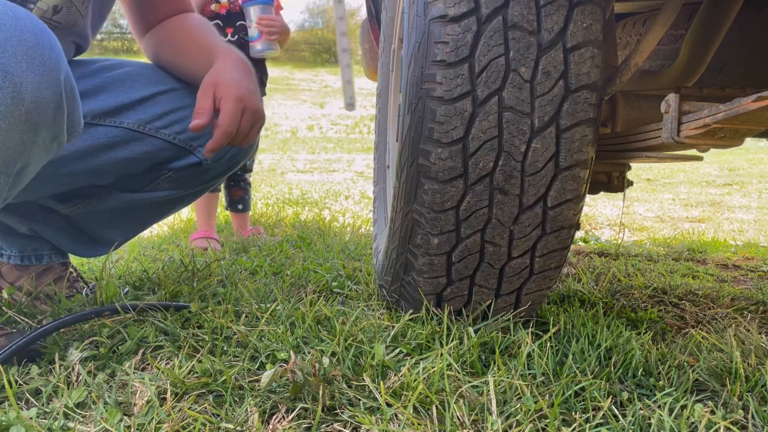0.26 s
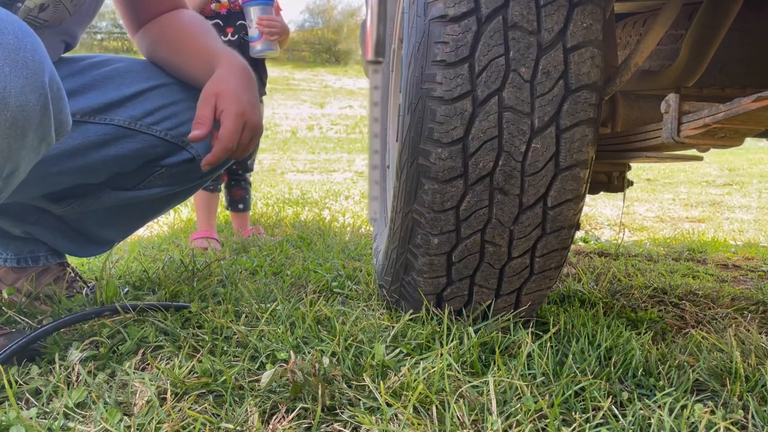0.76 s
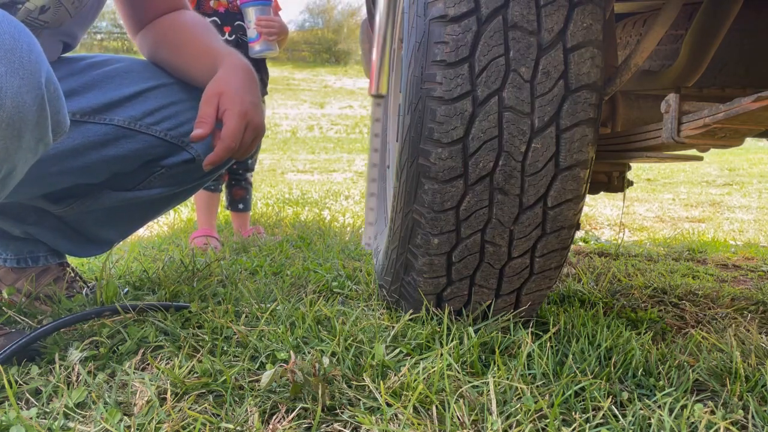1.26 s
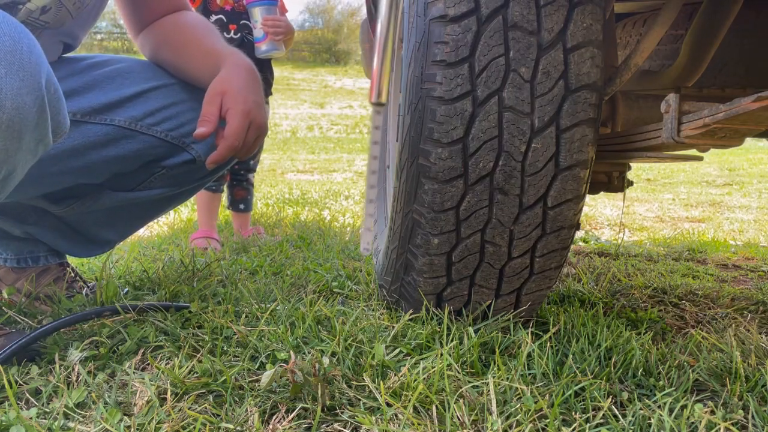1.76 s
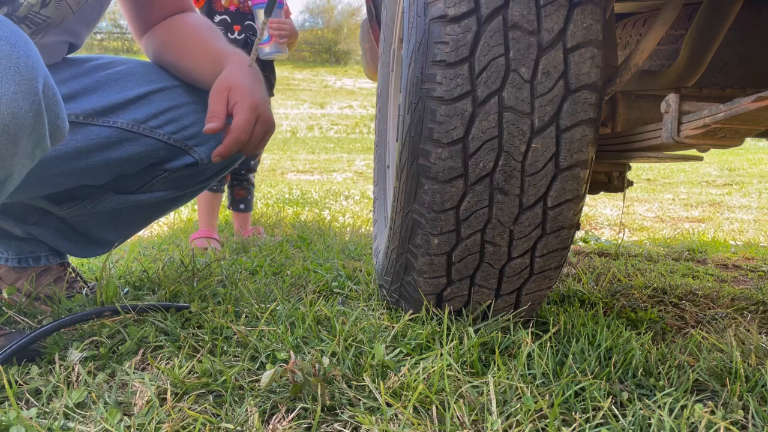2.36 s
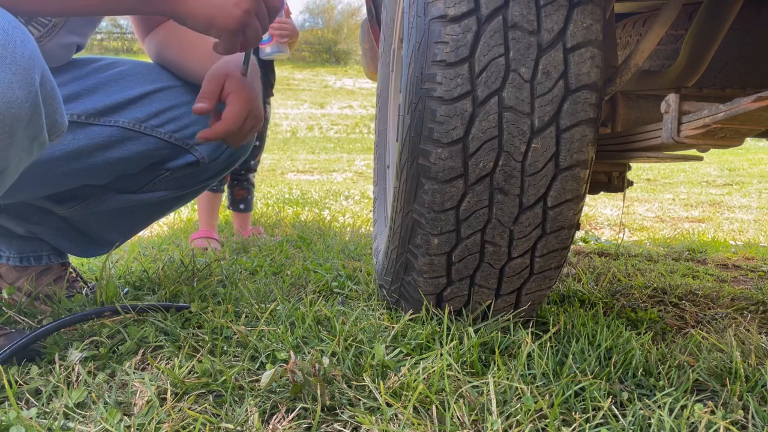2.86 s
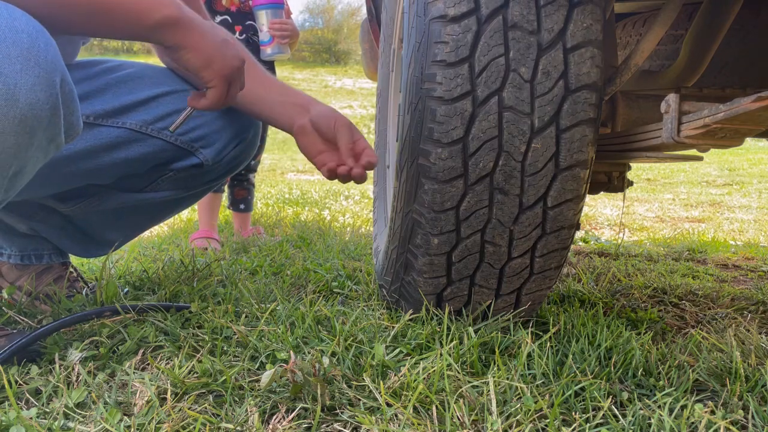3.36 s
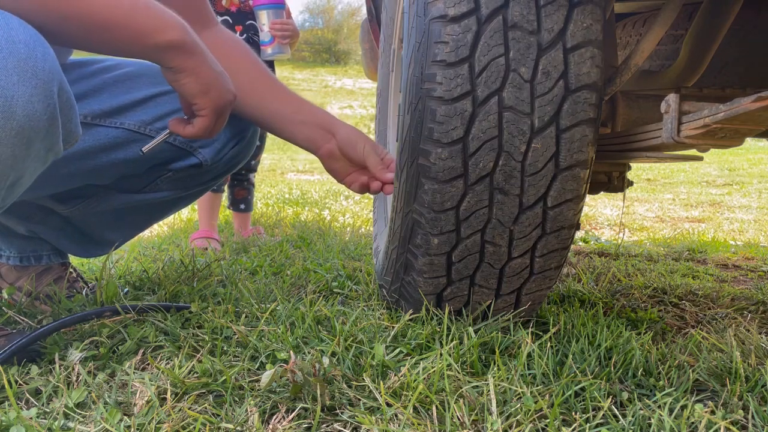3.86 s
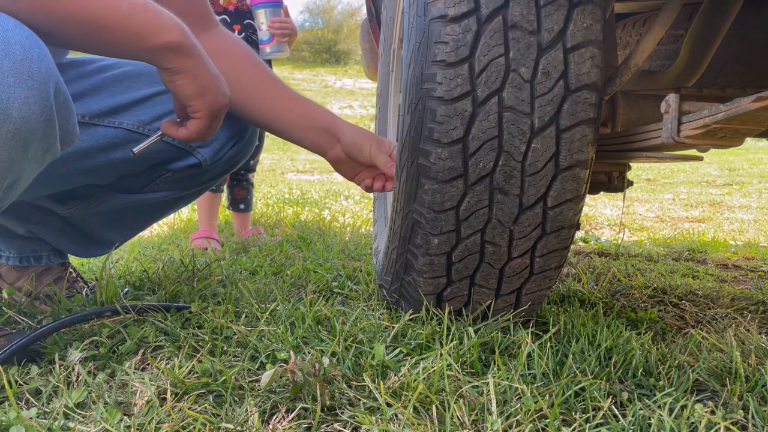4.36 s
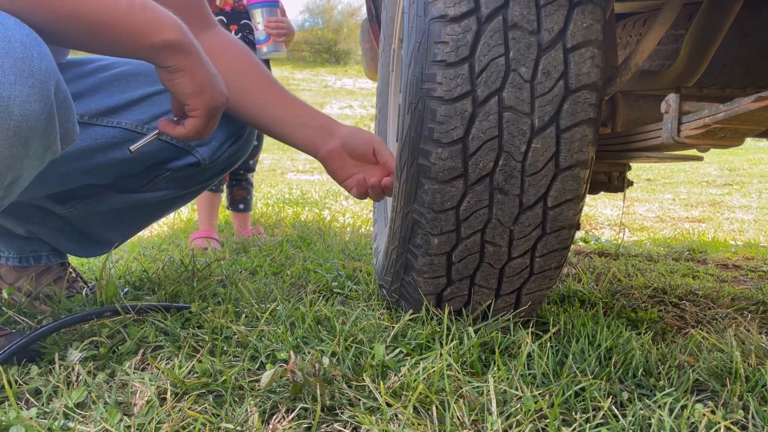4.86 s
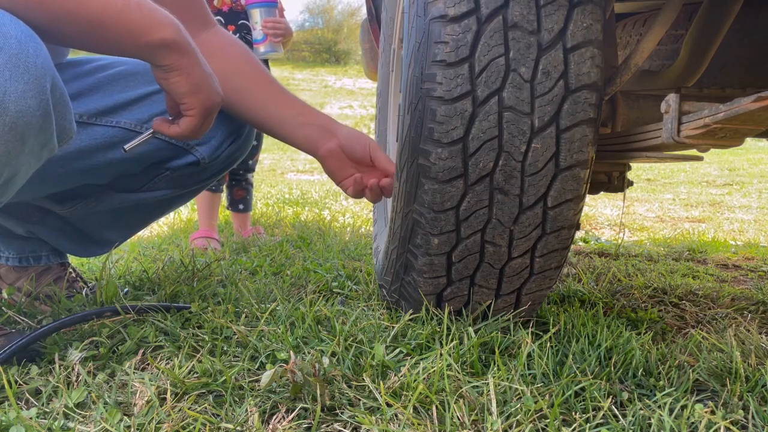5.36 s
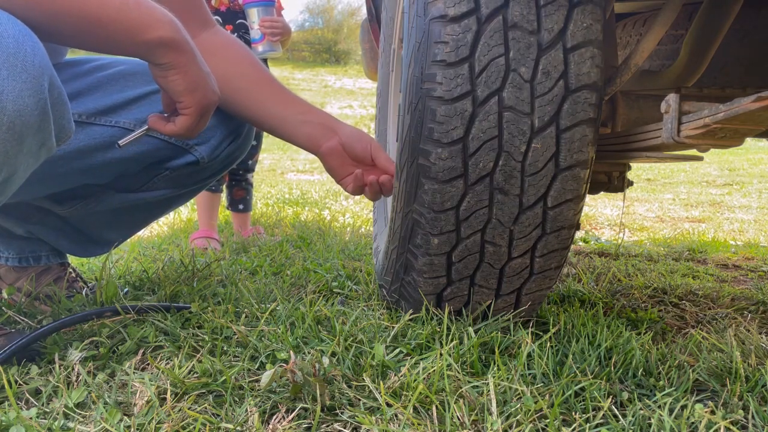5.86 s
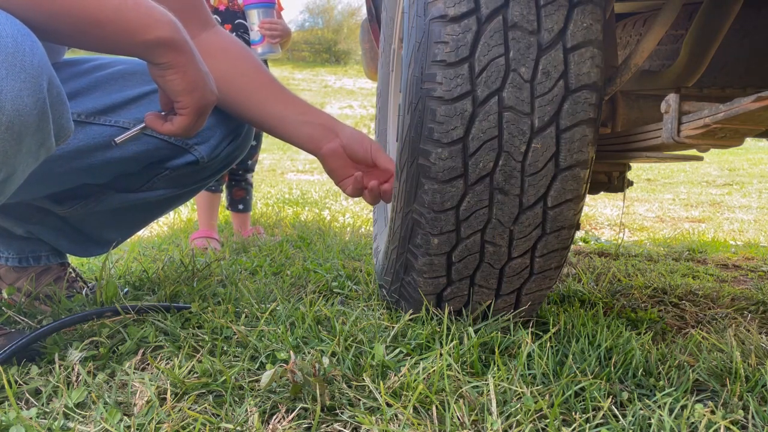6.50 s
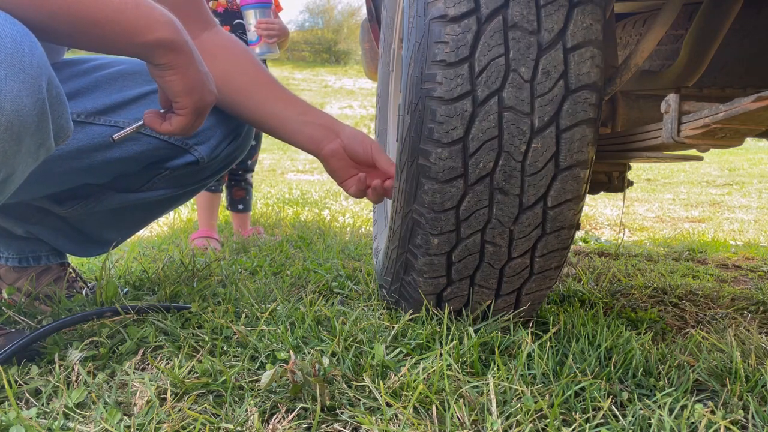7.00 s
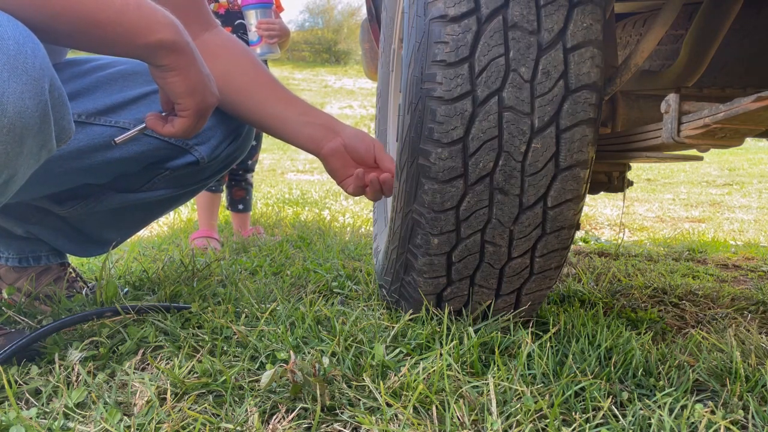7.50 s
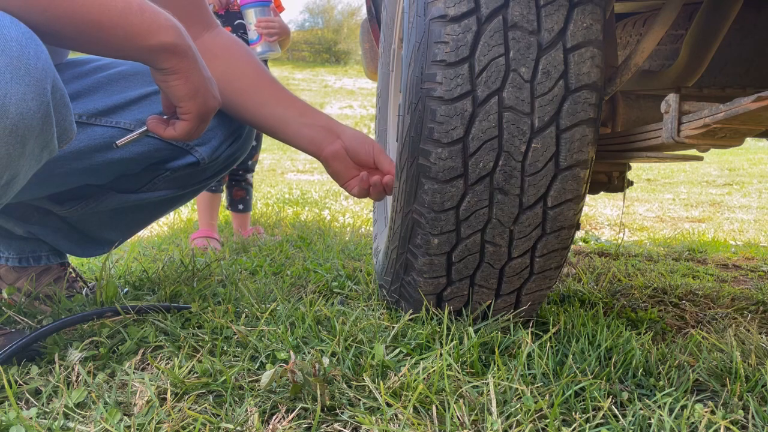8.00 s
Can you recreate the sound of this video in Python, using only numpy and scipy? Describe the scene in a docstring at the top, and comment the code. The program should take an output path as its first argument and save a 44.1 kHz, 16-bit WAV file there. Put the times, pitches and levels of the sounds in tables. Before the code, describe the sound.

A small piston air compressor hums, buzzes and rattles steadily outdoors while filling a tyre, with a few faint raspy insect pips and tiny ticks.

```python
"""From the start a small piston air compressor fills a tyre on a lawn, slowing steadily: sines at multiples of
its shaft speed hum and whine, shaped noise makes the housing rumble and the valves rattle once a turn.
Early on the deep rumble surges three times. At 1.4 s come raspy falling insect pips, gliding sines, then
from 3 s a few ticks, short bursts of noise. A thin band of high noise near 15.5 kHz swells around 3.4 s, more
pips and ticks follow between 3.9 and 6.3 s, and the high noise returns near the end. A faint hiss runs throughout."""
import sys
import numpy as np
from scipy import signal
from scipy.fft import rfft, irfft, next_fast_len
from scipy.io import wavfile
from scipy.ndimage import uniform_filter1d, map_coordinates

SR = 44100
rng = np.random.default_rng(int(sys.argv[2]) if len(sys.argv) > 2 else 0)


def store_wav(level_fs):
    """Save 16-bit WAV to argv[1]."""
    pcm = np.round(np.clip(np.atleast_2d(level_fs), -1, 1) * 32767)
    wavfile.write(sys.argv[1], SR, pcm.T.astype(np.int16))


N = 363384  # length in samples


def amp(db):
    """Turn decibels into a gain."""
    return 10 ** (np.asarray(db) / 20)


def unit(x):
    """Scale x to an rms (average strength) of 1."""
    return x / np.sqrt(np.mean(x ** 2) + 1e-20)


def along(points, hz):
    """Read a curve of (Hz, value) points at any pitch, on a log pitch axis."""
    point_hz, values = np.transpose(points)
    return np.interp(np.log(hz + 1), np.log(point_hz), values)


def wobble(rate):
    """Draw a smooth random curve through `rate` random points a second."""
    at = np.linspace(0, N, 2048)
    knots = rng.standard_normal(int(N * rate / SR) + 4)
    curve = map_coordinates(knots, [at * rate / SR + 1])
    return np.interp(np.arange(N), at, curve)


def filtered(x, response):
    """Change the strength and phase of each pitch in x by a response to frequency."""
    size = next_fast_len(N + 8192)
    spectrum = rfft(x, size) * response(np.fft.rfftfreq(size, 1 / SR))
    return irfft(spectrum, size)[..., :N]


def swells(rows, steep):
    """Add up rounded humps in dB, each (middle, length at half height, height); steeper means flatter tops."""
    t = np.arange(N) / SR
    return sum(db * .5 ** (np.abs(2 * (t - middle) / length) ** steep) for middle, length, db in rows)


def pan(balance_db):
    """Give left and right gains whose mean power is 1."""
    gains = amp(np.array([[.5], [-.5]]) * balance_db)
    return gains / np.sqrt(np.mean(gains ** 2, axis=0))


# How alike left and right are. Each row: pitch in Hz, likeness from 0 to 1.
LIKENESS = [(25, .6), (60, 0.91), (220, 0.98), (350, 0.67), (450, 0.73), (900, 0.19), (1700, 0.89),
            (2800, 0.22), (6500, 0.22), (8000, 1), (14000, 0.27)]
# How far right runs ahead of left. Each row: pitch in Hz, lead in radians.
RIGHT_LEAD = [(50, 0), (230, .35), (330, .5), (430, 1.1), (520, 1.7), (850, 1.8), (1700, 1.4), (2150, .9),
              (2900, 1.4), (4800, 1.7), (5700, 2.6), (7500, 2.7), (9000, 2.5), (11000, 2.0), (14000, 2.6)]


def rush(spectrum, tilt=None, source=None):
    """Colour noise to rms 1, as two microphone ports hear it: partly alike and out of step."""
    source = rng.standard_normal((2, N)) if source is None else source

    def mixing(hz):
        turn = np.arccos(np.clip(along(LIKENESS, hz), 0, 1)) / 2
        return amp(along(spectrum, hz)) * [np.cos(turn), np.sin(turn)]

    def ports(hz):
        balance = pan(along(tilt, hz) if tilt else 0)
        return balance * np.exp(1j * np.array([[-.5], [.5]]) * along(RIGHT_LEAD, hz))

    mid, side = filtered(source, mixing)
    return unit(filtered(np.array([mid + side, mid - side]), ports))


def tone(angle, lead, balance_db):
    """Make a stereo sine of rms 1 that reaches the two ports out of step."""
    angle = (angle % (2 * np.pi)).astype(np.float32)
    offset = (np.array([[-.5], [.5]]) * lead).astype(np.float32)
    return (np.sqrt(2) * pan(balance_db)).astype(np.float32) * np.sin(angle + offset)


# Colour of the faint hiss. Each row: pitch in Hz, relative level in dB per Hz.
HISS_COLOUR = [(2000, -21), (5000, -1.5), (6500, 12.5), (7300, 15.5), (7900, 5.5), (8900, 6.5), (10500, 5),
               (13000, -3.5), (14200, -14), (15700, -25)]
# Spells of high narrow noise. Each row: middle in seconds, length in seconds, rise over the resting level in dB.
HIGH_NOISE_SPELLS = [(3.43, 2.1, 15.5), (8.1, 1.1, 13)]


def field(hiss_db=-60, high_db=-83, pulse_db=2):
    """A steady faint hiss, and a thin, trembling band of narrow noise near 15.5 kHz that comes and goes."""
    level_db = high_db + swells(HIGH_NOISE_SPELLS, steep=6) + pulse_db * wobble(50)
    high_colour = [(6000, -120), (12500, -36), (14800, -23), (15550, 18.5), (15800, 3.0), (17000, -36)]
    high_noise = amp(level_db) * rush(high_colour)
    return amp(hiss_db) * rush(HISS_COLOUR) + high_noise


# Insect pips. Each row: middle in seconds, peak level in dB, middle pitch in Hz.
INSECT_PIPS = [(1.395, -50, 4430), (1.441, -47.5, 4420), (1.491, -45, 4380), (1.543, -41.5, 4420),
               (4.575, -47, 4420), (4.621, -50, 4350), (4.665, -47, 4400), (5.142, -46, 4380),
               (5.183, -45, 4400), (6.318, -44.5, 4430)]


def chirps(fall_hz=330, length_s=0.015, rasp=.45):
    """Short pips from an insect in the grass: falling sines, made raspy by random phase (rasp in radians)."""
    out = np.zeros(N)
    u = np.linspace(0, 1, int(length_s * SR))
    for middle, db, pitch_hz in INSECT_PIPS:
        grain = rasp * unit(uniform_filter1d(rng.standard_normal(len(u)), size=60))
        glide_hz = pitch_hz - fall_hz * (u - .5)
        pip = np.sin(2 * np.pi * np.cumsum(glide_hz) / SR + grain) * np.sin(np.pi * u) ** 2
        out[round((middle - length_s / 2) * SR):][:len(u)] += amp(db) * pip
    return out


# Tiny ticks. Each row: start in seconds, starting noise level in dB before the treble is favoured.
TINY_TICKS = [(2.993, -58), (3.057, -63), (3.073, -60), (3.156, -62), (3.873, -53), (4.03, -62),
              (5.807, -62), (6.08, -60)]


def ticks(t60_s=.012):
    """Tiny bright ticks close by: bursts of noise that die away by 60 dB in t60_s seconds."""
    out = np.zeros(N)
    t = np.arange(SR // 20) / SR
    for start, db in TINY_TICKS:
        out[round(start * SR):][:len(t)] += amp(db - 60 * t / t60_s) * rng.standard_normal(len(t))
    return filtered(out, lambda hz: amp(along([(3000, -20), (12000, 2)], hz)))


def pressure(load_s=4.5):
    """The load on the pump builds fast, then levels off (time constant load_s), from -.5 at start to .5 at end."""
    built = 1 - np.exp(-np.arange(N) / SR / load_s)
    return built / built[-1] - .5


# Echoes of the noise on later turns. Each row: delay in turns, share (below zero means turned over).
ROCKING_ECHOES = [(1, -.2), (2, .13)]


def rocking(noise, shaft):
    """The pump rocks to and fro on alternate strokes, so its noise gathers halfway between the orders."""
    turn = 2 * np.pi * N / (shaft[-1] - shaft[0])  # average samples a turn
    echoes = sum(share * np.roll(noise, round(turns * turn), axis=1) for turns, share in ROCKING_ECHOES)
    return unit(noise + echoes)


# Colour of the deep rumble. Each row: pitch in Hz, relative level in dB per Hz.
RUMBLE_COLOUR = [(20, -46), (35, -20), (52, -6.5), (72, -1), (85, 1.5), (130, -16), (400, -120)]
# Surges of the deep rumble. Each row: middle in seconds, length in seconds, rise in dB.
RUMBLE_SURGES = [(.5, 0.89, 14), (2, .4, 6), (3.88, 0.29, 9)]
# Colour of the shaking housing. Each row: pitch in Hz, relative level in dB per Hz.
HOUSING_COLOUR = [(15, -48), (30, -33), (55, -41), (78, -7), (112, -4), (138, -8), (152, -11), (168, -8),
                  (198, -15), (225, 3.5), (275, -8.5), (360, -4.5), (450, -13), (600, -18), (1200, -63),
                  (3000, -120)]


def housing(shaft, rumble_db=-49.0, body_db=-36, throb_db=-1.6, swell_db=0.5):
    """The housing shakes, throbbing once a turn, over a deep rumble that surges at times."""
    rumble = amp(rumble_db + swells(RUMBLE_SURGES, steep=1.3)) * rush(RUMBLE_COLOUR)
    body = rush(HOUSING_COLOUR, source=rocking(rng.standard_normal((2, N)), shaft))
    body_level_db = body_db + throb_db * np.cos(shaft) + swell_db * wobble(14)
    return rumble + amp(body_level_db) * body


# Smaller beats within a turn. Each row: beats per turn, relative share.
SMALL_BEATS = [(2, .5), (3, 1.5), (4, 1), (5, 1.4), (6, .8), (8, 1)]


def strokes(shaft, main_db, beat_db, scatter_db):
    """Gain of a noise that bursts once a turn, a little unevenly, with smaller beats in between."""
    beats = sum(share * np.cos(k * shaft + k * k) for k, share in SMALL_BEATS)
    uneven = wobble(47)
    return unit(amp(main_db * np.cos(shaft) + beat_db * beats + scatter_db * uneven))


def patches(patchy_db, size=2, count=9):
    """Two white noises whose narrow bands flare and fade, smoothed over `size` bands and `count` time steps."""
    bands = signal.stft(rng.standard_normal((2, N)), nperseg=2048)[2]
    flare = uniform_filter1d(rng.standard_normal(bands.shape[1:]), size, 0)
    flare = uniform_filter1d(flare, count, 1)
    return unit(signal.istft(bands * amp(patchy_db * unit(flare)), nperseg=2048)[1][:, :N])


# Resonances that colour the rattle. Each row: centre in Hz, width in Hz, boost in dB.
CASING_RESONANCES = [(1090, 110, 2), (1310, 61, 3.5), (1476, 90, 2), (1676, 100, 4), (1920, 70, 2),
                     (1990, 46, 3.5), (2125, 44, 3.5), (2280, 53, 4.5), (2470, 48, 4.5), (2670, 60, 2),
                     (3280, 160, 2.5), (3500, 74, 3), (3730, 140, 1), (4030, 56, 6), (4320, 170, 3.5)]


def casing(hz):
    """The casing rings at its own pitches and so boosts them, each as a rounded peak."""
    boost_db = 0
    for centre, width, db in CASING_RESONANCES:
        distance = np.minimum(np.abs(2 * (hz - centre) / width), 10)
        boost_db = boost_db + db * np.exp2(-distance ** 2)
    return amp(boost_db)


def grind(shaft, repeat_db, patchy_db, size=940):
    """Patchy noise of rubbing parts: some of it comes back alike on every turn, which makes it buzz."""
    track = rng.standard_normal((2, size))  # the noise of one turn
    place = (shaft / (2 * np.pi) % 1 * size).astype(int)
    noise = rocking(patches(patchy_db), shaft) + amp(repeat_db) * track[:, place]
    return filtered(noise, casing)


# Colour of the valves' rattle. Each row: pitch in Hz, relative level in dB per Hz.
VALVE_COLOUR = [(100, -12.5), (600, -4.5), (800, -0.5), (1000, -5.5), (1250, -4), (1650, -0.5), (1850, -3),
                (2100, -0.5), (2450, -4.5), (2700, -12), (3200, -21), (6000, -120)]
# Colour of the piston's rasp. Each row: pitch in Hz, relative level in dB per Hz.
PISTON_COLOUR = [(1500, -44), (2750, -2.5), (3600, -4.5), (4100, -5), (4450, -3), (4800, -4.5), (5600, -6),
                 (9000, -22), (16000, -39)]
# Lean of the rattle to one side. Each row: pitch in Hz, left over right in dB.
RATTLE_TILT = [(800, 0.5), (1300, 6.5), (1650, 3.5), (2100, 12), (2400, 7.5), (2900, -1), (4400, 0.5),
               (5500, -2.5), (6500, -1)]


def clatter(shaft, valves_db=-39.5, ease_db=-0.5, piston_db=-51):
    """The valves rattle in uneven bursts and ease a little as the pressure grows, with the piston's higher rasp."""
    bursts = strokes(shaft, main_db=1.7, beat_db=.8, scatter_db=.9)
    valves = bursts * rush(VALVE_COLOUR, RATTLE_TILT, grind(shaft, repeat_db=-13, patchy_db=1.9))
    rubbing = rush(PISTON_COLOUR, RATTLE_TILT, grind(shaft, repeat_db=-12, patchy_db=1.5))
    rasp = strokes(shaft, main_db=-0.5, beat_db=0.17, scatter_db=0.77) * rubbing
    return amp(valves_db + ease_db * pressure()) * valves + amp(piston_db) * rasp


# Lines halfway between the orders. Each row: pitch in Hz, level of each line in dB before it flutters.
UNEVEN_LINES = [(70, -65), (117, -53.5), (165, -58.5), (257, -72), (304, -63), (351, -54), (398, -59.5),
                (445, -60.5), (492, -72), (600, -63), (820, -59.5), (960, -71.5), (1200, -67)]


def lope(shaft, speed_hz, wander=0.56, flutter_db=1.8, count=24):
    """Alternate strokes differ by unsteady amounts, which gives fuzzy lines between the orders."""
    out = np.zeros((2, N))
    for order in np.arange(count) + 1 + .5:
        hz = order * speed_hz
        angle = order * shaft + rng.uniform(0, 2 * np.pi) + wander * wobble(8)
        gain = amp(along(UNEVEN_LINES, hz) + flutter_db * wobble(9))
        out += gain * tone(angle, along(RIGHT_LEAD, hz), 0.61)
    return out


# Single orders sing out or fade for a while.
# Each row: middle in seconds, length in seconds, multiple of the shaft speed, change in dB.
ORDER_SWELLS = [(.55, .62, 13, 10), (1.56, .6, 13, 11.5), (5.5, .9, 13, 3), (.55, .5, 15, 4),
                (1.55, .6, 15, 6), (2.65, 1.2, 22, 5.5), (.2, .7, 22, -6), (3.68, .25, 96, 5),
                (4.6, .5, 96, 2.5), (1, 2.2, 83, -4), (4.8, 1.1, 83, -3), (6.9, 1.1, 83, 2),
                (8.1, .6, 83, -3), (5.5, 1.1, 28, 4), (5.5, 1, 33, 3), (5.7, .8, 36, 8), (6.6, 1, 92, 3),
                (7.5, 1.4, 80, 3), (.6, .5, 2, 1), (1.5, .6, 2, 1.3), (2.5, .6, 2, -1.8), (4.6, .8, 2, -.8),
                (6.95, .4, 2, 1.2), (.65, .6, 4, -2), (1.65, .6, 4, -4.5), (4, .7, 4, 1.5),
                (7.6, .6, 4, 2.5), (2.6, .7, 5, 2), (5.9, .9, 5, -1.5), (7.6, .8, 5, 1.5), (.65, .4, 7, 2),
                (1.65, .5, 7, 3), (.7, 1.4, 9, -2.5), (3.3, 1.8, 9, 1.5), (5.3, 1.3, 9, -2),
                (.4, 1.2, 96, 7), (2.5, 1, 96, 2), (1.1, 2, 17, -1.5), (3.1, 1.8, 17, 2.5), (3, 1.6, 12, 3),
                (3.5, 2.4, 19, 1.5), (3.5, 2.4, 25, 2), (4, 1.8, 95, 2.5), (0, .9, 45, -2), (.2, 1, 79, -3)]


def partial(k, shaft, balance_db, lead, waver_db, jitter):
    """A sine at k times the shaft speed, wavering in strength and phase (jitter in radians) and swelling at times."""
    if k <= len(HUM_ORDERS):
        delay = .38 * k ** 2  # the body delays higher orders more, spreading each thump over the turn
    else:
        delay = rng.uniform(0, 2 * np.pi)  # high orders fall anywhere in the turn
    own_swells = [(middle, length, db) for middle, length, order, db in ORDER_SWELLS if order == k]
    swell_db = swells(own_swells, steep=7.9)
    gain = amp((waver_db * wobble(6) + swell_db).astype(np.float32))
    return gain * tone(k * shaft + delay + jitter * wobble(14), lead, balance_db)


# The weaker orders. Each row: pitch in Hz, level of each order in dB before it wavers, left over right in dB.
OVERTONE_LEVELS = [(470, -60.5, -29), (563, -52, -4.5), (609, -58, 3.5), (655, -56, 2.5), (935, -69, 2),
                   (1125, -65, 0), (1260, -69, 2), (1400, -64, -7), (1840, -62.5, 20), (2460, -65.5, 13),
                   (2920, -84, 3), (3750, -86, 9), (4340, -74, 1), (4900, -72, -3)]


def overtones(shaft, speed_hz, waver_db=3.0, jitter_per_khz=0.17, count=104):
    """The weaker orders fill the gaps between the singing ones, rougher the higher they lie."""
    levels = np.array(OVERTONE_LEVELS)[:, :2]
    balances = np.array(OVERTONE_LEVELS)[:, ::2]
    singing = [row[0] for row in WHINE_ORDERS]
    out = np.zeros((2, N), np.float32)
    for k in np.setdiff1d(np.arange(len(HUM_ORDERS), count) + 1, singing):
        hz = k * speed_hz
        jitter = jitter_per_khz * hz / 1000
        sine = partial(k, shaft, along(balances, hz), along(RIGHT_LEAD, hz), waver_db, jitter)
        out += float(amp(along(levels, hz))) * sine
    return out


# Higher orders that sing out. Each row: multiple of the shaft speed, level in dB before wavers and swells,
# left over right in dB, lead of the right port in radians, change from start to end in dB.
WHINE_ORDERS = [(11, -51.5, 8, 1.2, 1), (15, -54.0, 3, 2.6, -9), (16, -53.5, 12, 1.8, 3),
                (17, -47.0, 0, 2.4, 4), (18, -48, -1, 0.7, -2), (19, -52, -1, 0.8, 3),
                (20, -62, -1, 1.4, 0), (21, -56.0, -1, 1.9, 0), (22, -53.5, -1, 2.1, 3),
                (23, -57.5, 0, 0.6, 6), (24, -60, 0, 1.2, 6), (25, -56.5, 2, 1.6, 6),
                (26, -57.5, 2, 0.7, 7), (28, -57.0, 1, 1.6, 0), (31, -56.5, 5, 1.0, 10),
                (33, -59, 7, 1.5, 4), (38, -58.0, 11, 1.6, 8), (40, -53.5, 8, 1.0, -2),
                (41, -59.0, 5, 1.1, -8), (45, -51.5, 7, 0.6, -15), (46, -54, 7, -0.7, 3),
                (47, -58.0, 8, 0.3, 8), (49, -57.0, 10, 2.4, 16), (53, -62, 7, 1.0, 14),
                (55, -63.5, 3, -0.4, 16), (56, -66, 3, 1.0, 14), (62, -66.5, 1, 2.2, 8),
                (64, -65.5, 4, 1.2, -1), (75, -69, 1, 1.5, 8), (79, -67.5, 0, 1.9, -15),
                (80, -69.0, -1, 1.6, -3), (82, -70, 1, 1.2, 8), (83, -65, 1, -0.1, 13),
                (85, -67.0, 5, 1.8, -5), (86, -67.5, 1, -1.5, 13), (91, -69.5, 0, 1.6, 8),
                (92, -66.5, -1, 2.3, 11), (94, -68.0, 5, 2.3, 6), (95, -66, -2, 1.7, -4),
                (96, -64.5, -2, 1.0, 11), (100, -69.5, -1, 1.6, 6), (107, -69.0, -6, 1.8, 2)]
# Flutter of the whine in dB per kHz of pitch: every other turn, once a turn, twice a turn.
WHINE_FLUTTER = (.2, .3, .45)
# Orders that ring the metal of the pump, pulsing with each stroke.
# Each multiple of the shaft speed has: swing of the pulse in dB, chance flutter in dB.
METAL_RINGS = {45: (2.2, .7), 96: (5, 2.5)}


def whine(shaft, speed_hz, waver_db=1.53, waver_db_per_khz=.1, jitter_per_khz=.08):
    """Higher orders grow or fade as pressure builds; the highest are roughest and flutter most with the stroke."""
    load = pressure()
    slow, once, twice = WHINE_FLUTTER
    flutter = np.cos(shaft / 2) * slow + np.cos(shaft) * once + np.cos(2 * shaft) * twice
    out = np.zeros((2, N))
    for k, db, balance_db, lead, change_db in WHINE_ORDERS:
        khz = k * speed_hz / 1000
        gain = amp(db) * unit(amp((change_db * load + khz * flutter).astype(np.float32)))
        if k in METAL_RINGS:
            pulse_db, chance_db = METAL_RINGS[k]
            gain = gain * unit(amp(pulse_db * np.cos(shaft) + chance_db * wobble(45)))
        roughness_db = waver_db + waver_db_per_khz * khz
        out += gain * partial(k, shaft, balance_db, lead, roughness_db, jitter_per_khz * khz)
    return out


# The first orders, from the shaft speed itself upward.
# Each row: level at middle load in dB before wavers and swells, left over right in dB, change from start to end in dB.
HUM_ORDERS = [(-49, 2, 1), (-34, 0.5, -.5), (-46.5, 12, -1.5), (-38.5, 3.5, 0), (-37, -1.5, 0.5),
              (-46.5, 18, -1.5), (-41, 4, 0), (-47, 3.5, -1), (-47, 6, 3)]


def hum(shaft, speed_hz, waver_db=1.02):
    """The firm low orders of the pump shift in strength as the pressure builds."""
    load = pressure()
    out = np.zeros((2, N))
    for k, (db, balance_db, change_db) in enumerate(HUM_ORDERS, 1):
        lead = along(RIGHT_LEAD, k * speed_hz)
        out += amp(db + change_db * load) * partial(k, shaft, balance_db, lead, waver_db, 0)
    return out


def compressor(start_hz=46.885, sag_hz_per_s=.026):
    """One shaft drives every part; it slows steadily under the growing load and trembles slightly."""
    speed = start_hz - sag_hz_per_s * np.arange(N) / SR
    shaft = 2 * np.pi * np.cumsum(speed) / SR  # angle in radians
    shaft = shaft + 0.005 * wobble(6.5) + 0.0023 * wobble(30)
    lines = sum(part(shaft, speed.mean()) for part in (hum, whine, overtones, lope))
    return lines + housing(shaft) + clatter(shaft)


def scene():
    """The compressor in the open air, with the small sounds around it."""
    return compressor() + field() + chirps() + ticks()


def record(dry, top_hz=15780):
    """Nothing above the top pitch is kept."""
    return filtered(dry, lambda hz: hz < top_hz)


dry = scene()
out = record(dry)
store_wav(out)
```